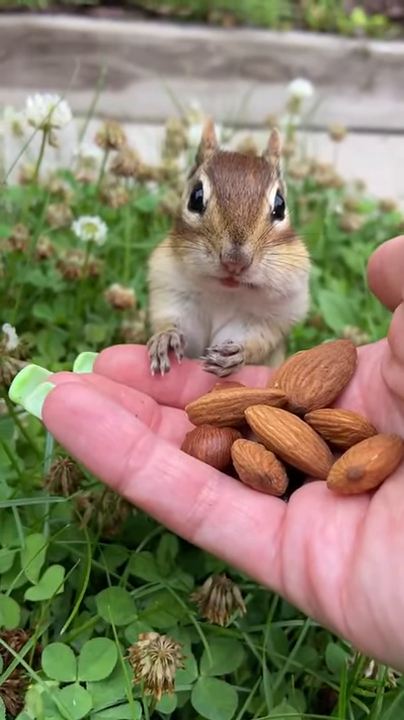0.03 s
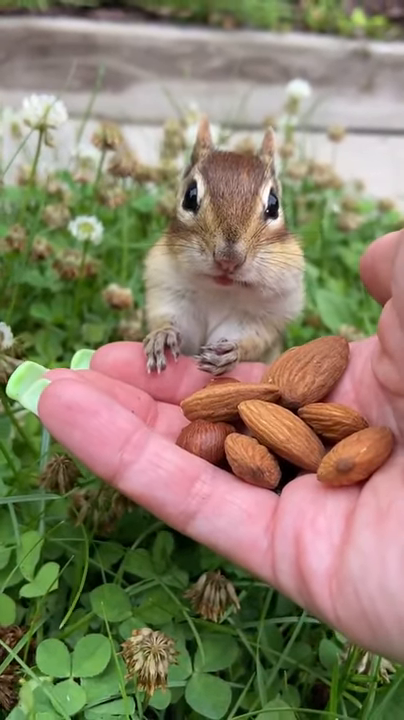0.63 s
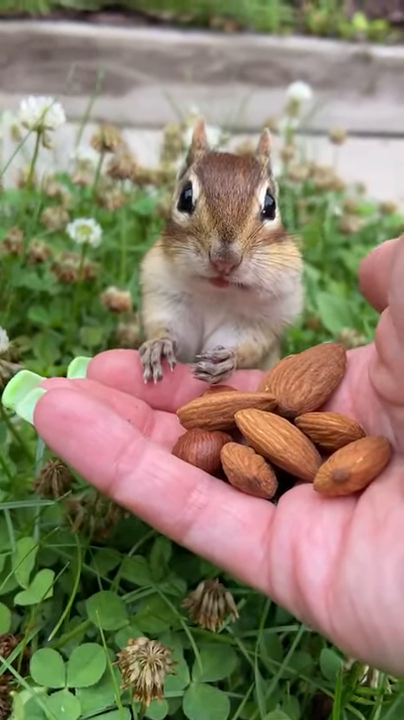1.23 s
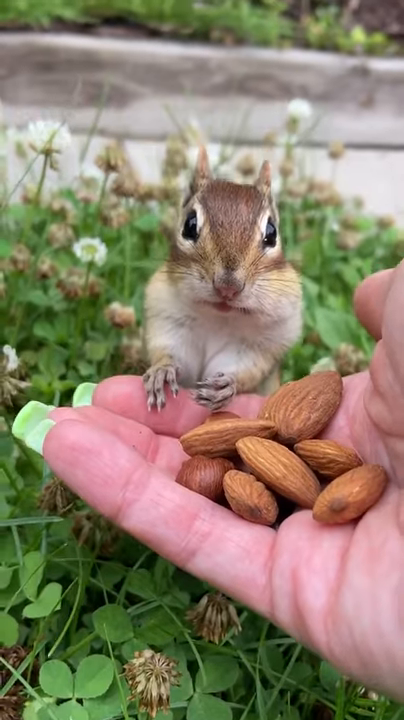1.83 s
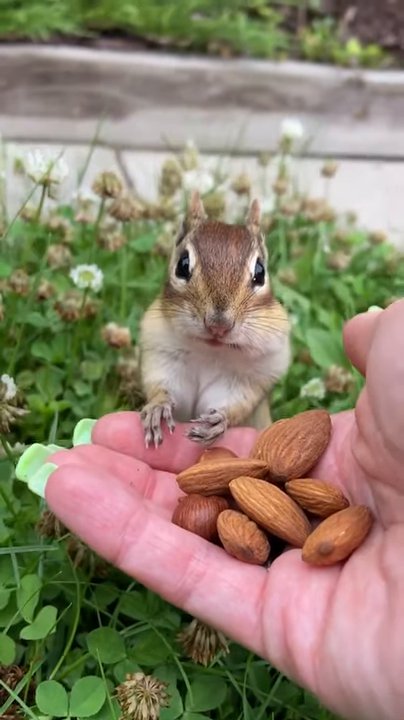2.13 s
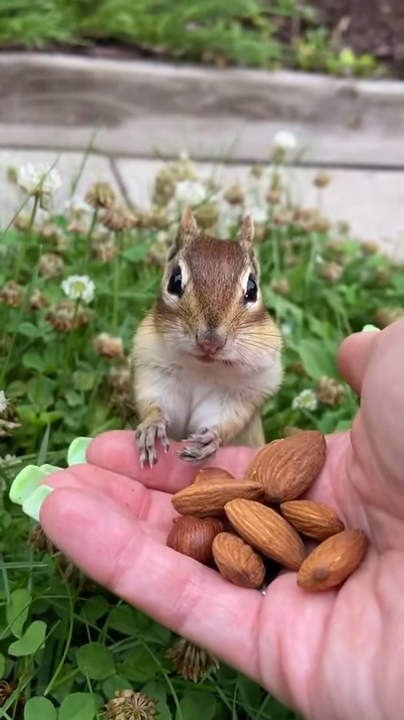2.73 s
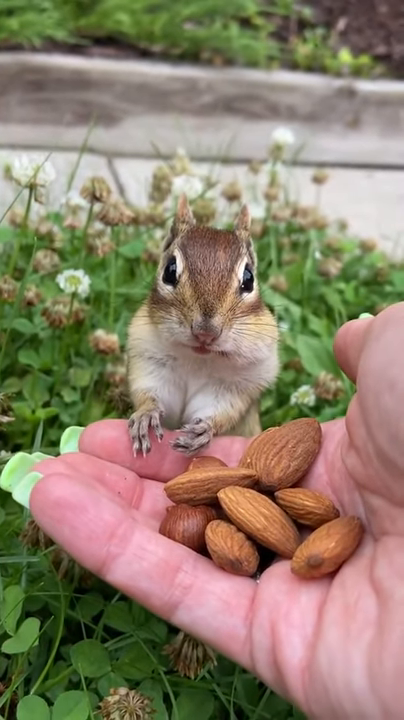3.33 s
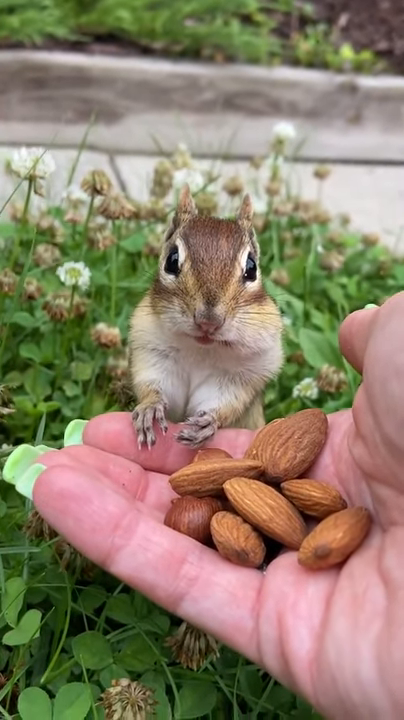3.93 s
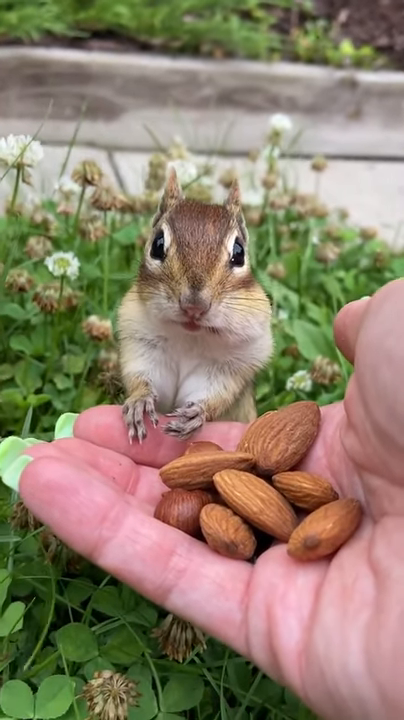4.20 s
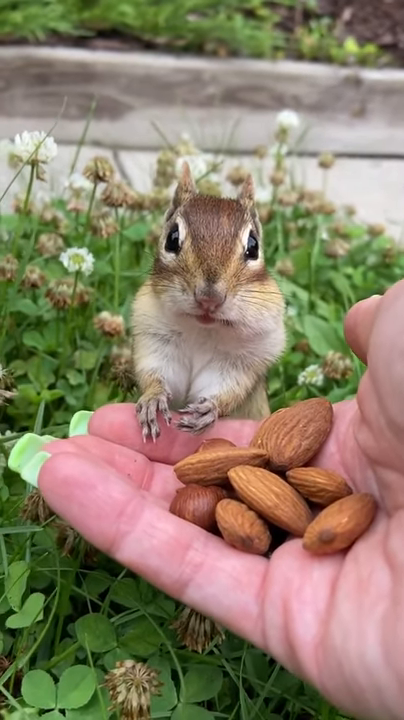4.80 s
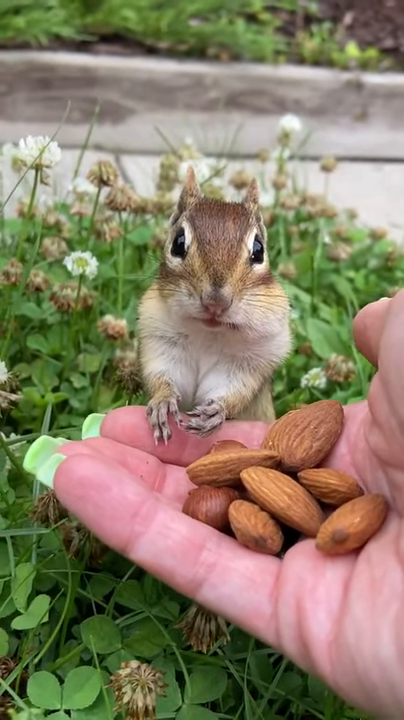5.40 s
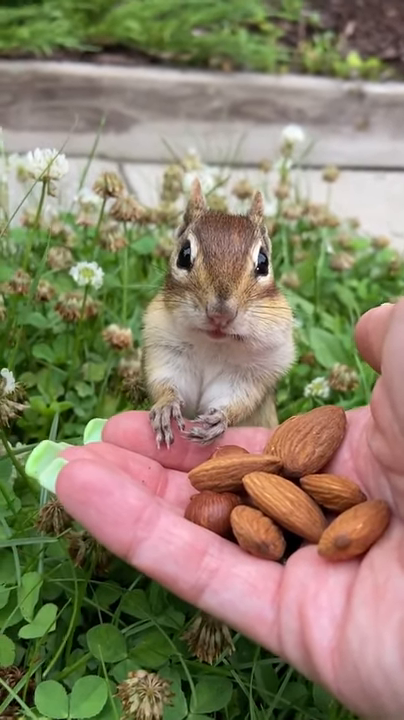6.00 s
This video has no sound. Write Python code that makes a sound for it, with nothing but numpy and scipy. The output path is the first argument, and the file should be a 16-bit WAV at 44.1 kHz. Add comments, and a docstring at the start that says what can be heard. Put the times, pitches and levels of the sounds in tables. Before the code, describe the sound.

A far engine pulls away with booming exhaust surges and a gear change, over low traffic rumble, soft hiss and approaching tyres.

```python
"""A distant engine pulls away, rises in pitch, changes gear and pulls again over rumbling traffic.
It is heard near the grass of a quiet garden beside a town street; its exhaust booms in surges.
One car passes faintly, then the tyre roar of nearer ones slowly swells, with a few dull knocks from
wheels on the uneven road and a heavy vehicle's deep rumble. A far bird sings once in the soft hiss."""
import sys
import numpy as np
from scipy import signal
from scipy.fft import rfft, irfft, next_fast_len
from scipy.io import wavfile
from scipy.ndimage import uniform_filter1d, map_coordinates

SR = 44100
rng = np.random.default_rng(int(sys.argv[2]) if len(sys.argv) > 2 else 0)


def unload_audio(sound):
    """Save the sound as a 16-bit wav file, at the path given as the first command line argument."""
    columns = np.transpose(np.atleast_2d(sound))
    # keep every value between -1 and 1, then stretch to whole-number steps
    steps = np.round(np.clip(columns, -1, 1) * 32767)
    wavfile.write(sys.argv[1], SR, steps.astype(np.int16))


N = 271215


def engine():
    """The firing rate and two overtones carry this far; they boom under load and sink at the gear change."""
    # engine speed, climbing through one gear and dropping into the next: t/s, firing rate/Hz
    speed = [(0, 79.5), (0.9, 82.2), (1.3, 86.35), (1.54, 91.14), (1.95, 94.6), (2.2, 100), (2.48, 109.2),
             (2.75, 115.8), (3.0, 121.2), (3.42, 126.7), (4.35, 88.05), (4.6, 95.6), (5.0, 101.6),
             (5.2, 102.1), (5.68, 96.6), (5.85, 102.6), (6.1, 104)]
    # exhaust under the surges: t/s, level/dB, first overtone against the lowest tone/dB
    load = [(0, -52, -8), (1.1, -43, -17), (1.6, -40, -9.5), (2.3, -42, -14.5), (2.45, -31, -10.5),
            (3.0, -36.5, -9.5), (3.35, -31, -23.5), (3.48, -48, -11), (4.3, -55, -26), (4.75, -38.5, -24),
            (5.17, -36, -16), (5.35, -42.5, -14), (5.85, -38, -13), (6.15, -37, -22)]
    # booms of the exhaust: start/s, hold/s, level/dB
    surges = [(-0.05, 0.11, -36), (0.87, 0.081, -34.5), (1.495, 0.68, -28), (2.43, 0.2, -30.5),
              (2.73, 0.18, -32.5), (3.06, 0.305, -27), (4.43, 0.18, -33), (4.88, 0.14, -30),
              (5.51, 0.21, -31.7), (6.02, 0.07, -28.2)]
    # what the way from the street then takes off those levels: f/Hz, gain/dB
    carry = [(130, -2), (185, -3), (220, -3.5), (255, -5.5), (285, -13), (400, -10)]
    firing_hz, = curves(speed)
    firing_hz = firing_hz * (1 + 0.0027 * wobble(10))  # the speed wanders a little
    steady_db, overtone_db = curves(load)
    note = np.zeros(N)
    for multiple, db in enumerate([0, overtone_db, overtone_db - 20], 1):
        partial = tone(multiple * firing_hz, flutter_db=0.67 * multiple, flutter_rate=25)
        note += amp(db + along(carry, multiple * firing_hz)) * partial
    note *= amp(1.17 * wobble(55))  # a quick, uneven shake in loudness
    booms = np.max([amp(db) * surge(start, hold) for start, hold, db in surges], axis=0)
    return np.maximum(booms, amp(steady_db)) * note * amp([[-.4], [.4]])  # a little to the right


def tyres():
    """Each car's tyres roar louder as it nears, and later turn dull; farther streets are always dull."""
    # passing cars: nearest at/s, level there/dB, time to drive its distance from us/s, dulls from/s
    cars = [(2.82, -51.5, 0.26, 4.3), (4.6, -49.5, 0.64, 4.97), (5.7, -43, 1.0, 4.57)]
    # bright tyre roar: f/Hz, level/dB
    bright_spectrum = [(120, -10), (260, 5), (380, 3), (500, -0.5), (630, -3), (830, 1.0), (1000, -2.5),
                       (1250, -7), (1600, -12.5), (2500, -19.5), (4000, -29.5), (8000, -77)]
    # dull tyre roar: f/Hz, level/dB
    dull_spectrum = [(120, -19), (190, 5), (245, 11.5), (285, 9), (380, 2), (500, 1), (610, 0), (720, 3),
                     (850, 1.6), (990, .5), (1150, -9.5), (1600, -20), (2500, -22), (4000, -34),
                     (8000, -50)]
    far_road_db, dulling_s = -52, 0.86
    t = np.arange(N) / SR
    bright_power, dull_power = 0, amp(far_road_db) ** 2
    for nearest, db, passing, dull_from in cars:
        power = amp(db) ** 2 / (1 + ((t - nearest) / passing) ** 2)  # twice as far, a quarter the power
        dullness = np.clip((t - dull_from) / dulling_s, 0, 1)
        bright_power = bright_power + (1 - dullness) * power
        dull_power = dull_power + dullness * power
    bright = np.sqrt(bright_power) * rush(bright_spectrum, patchy_db=2.4)
    dull = np.sqrt(dull_power) * rush(dull_spectrum, patchy_db=2.0)
    return amp(0.11 * wobble(9)) * (bright + dull)


def knocks(ring_s=0.14, rise_s=0.0034):
    """Wheels jolt on the uneven road: short bursts of noise that ring around one pitch and die away."""
    # knocks: t/s, level/dB, f/Hz, top of the band divided by f
    jolts = [(2.757, -46.5, 1060, 1.3), (3.04, -45, 642, 1.2), (4.78, -39.5, 560, 1.35),
             (5.087, -38.5, 816, 1.09), (5.695, -41, 773, 1.23), (6.112, -36.5, 571, 1.26)]
    out = np.zeros((2, N))
    t = np.arange(SR // 3) / SR
    for start, db, hz, edge in jolts:
        band = signal.butter(2, [hz / edge, hz * edge], "bandpass", fs=SR, output="sos")
        ring = unit(signal.sosfilt(band, rng.standard_normal(len(t))))
        hit = amp(db - 60 * t / ring_s) * (1 - np.exp(-t / rise_s)) * ring
        out += np.pad(hit, (round(start * SR), N))[:N]
    return out


def far_engines(echo_share=0.44, spread_hz=15.6):
    """Other engines come through in short snatches, their notes partly blurred by echoes."""
    # snatches: start/s, hold/s, f/Hz, level/dB
    snatches = [(0, 0.28, 238.5, -46.5), (0.08, 0.22, 166, -44.5), (0.67, 0.074, 168, -41.5),
                (1.22, 0.23, 149, -37.5), (4.68, 0.45, 281, -48.5), (5.48, 0.11, 239.5, -43)]
    out = np.zeros(N)
    for start, hold, hz, db in snatches:
        direct = tone(hz + 2.17 * wobble(8.56), flutter_db=1.0, flutter_rate=16)
        echoes = narrow_noise(N, hz, spread_hz)
        note = np.sqrt(1 - echo_share) * direct + np.sqrt(echo_share) * echoes
        out += amp(db) * surge(start, hold) * note
    return out


def heavy_vehicle(nearest_s=6, nearest_db=-44, passing_s=0.17):
    """The deep rumble of a far, heavy vehicle swells as 1 / distance."""
    # deep rumble: f/Hz, level/dB
    spectrum = [(22, -42), (38, -6), (48, -8), (58, -10), (90, -30), (300, -80)]
    t = np.arange(N) / SR
    distance = np.sqrt(1 + ((t - nearest_s) / passing_s) ** 2)  # 1 at its nearest
    return amp(nearest_db) / distance * rush(spectrum, patchy_db=2, alike=[(40, 1.0)])


def bird():
    """Distance and echoes blur each note of a bird into a softly swelling band of noise."""
    # one phrase: start/s, length/s, f/Hz, spread/Hz, level/dB
    song = [(3.441, 0.16, 3040, 130, -59), (3.517, 0.21, 6900, 650, -64), (3.621, 0.61, 4630, 170, -68)]
    t = np.arange(N) / SR
    out = np.zeros((2, N))
    for start, length, pitch_hz, spread_hz, db in song:
        swell = np.sin(np.pi * np.clip((t - start) / length, 0, 1))
        out += amp(db) * swell * narrow_noise((2, N), pitch_hz, spread_hz)
    return out


def traffic(rumble_db=-38.5, drone_db=-40, drifts_per_s=2.524):
    """Many far engines blur into a deep rumble and a drone above it, both drifting in loudness."""
    # rumble: f/Hz, level/dB
    rumble_spectrum = [(15, -62), (25, -43), (38, -13), (50, -6.5), (66, 2.5), (85, 0.5), (110, -8),
                       (150, -5), (250, -33), (500, -78)]
    # drone: f/Hz, level/dB
    drone_spectrum = [(70, -11.5), (120, -0.5), (160, -1), (200, -3.5), (250, -7), (310, -14), (400, -16.5),
                      (550, -22.5), (1000, -33.5), (2000, -71)]
    rumble = rush(rumble_spectrum, patchy_db=1.9, alike=[(40, 0.99), (150, 0.99)])
    drone = rush(drone_spectrum, patchy_db=1.07)
    return (amp(rumble_db - 0.3 * wobble(drifts_per_s)) * rumble
            + amp(drone_db + 0.6 * wobble(drifts_per_s)) * drone)


def hiss(level_db=-54, treble_hz=4240, treble_fall_db_per_s=1.25, body_rise_db_per_s=0.04):
    """A wide, soft hiss that swells gently once, while its treble flickers and slowly fades."""
    # hiss: f/Hz, level/dB
    spectrum = [(300, -16), (800, -0.5), (1300, 5.5), (1900, 0.5), (2700, 0), (3300, -2.5), (4100, -4),
                (4900, -2.5), (6100, -7), (7500, -9), (9000, -11), (10500, -12.5), (12300, -13.5),
                (13100, -18.5)]
    t = np.arange(N) / SR
    noise = rush(spectrum, patchy_db=2.0)
    body = filtered(noise, lambda hz: 1 / (1 + (hz / treble_hz) ** 2))
    treble = (noise - body) * amp(-treble_fall_db_per_s * t + 0.63 * wobble(18))
    swell_db = 1.8 * np.exp(-.5 * ((t - 3.74) / 0.32) ** 2)
    return amp(level_db + swell_db) * (body * amp(body_rise_db_per_s * t) + treble)


def machine_hum(pitch_hz=329, level_db=-62):
    """A machine hums faintly on one slightly wavering note."""
    return amp(level_db) * tone(pitch_hz + 2 * wobble(5.5), flutter_db=4.0, flutter_rate=4.02)


def rush(spectrum, patchy_db, alike=None):
    """Open-air stereo noise of average strength 1, with drifting louder and softer patches."""
    # how alike left and right sound in the open air: f/Hz, likeness (1 = the same)
    open_air = [(60, 0.97), (150, .97), (260, 0.86), (400, 0.65), (620, 0.3), (750, 1), (1000, 0.35),
                (1200, 0.59), (1700, 0.27), (2500, 0.34), (3700, 0.32), (5700, 0.0075), (7300, 0.46),
                (8600, -0.49), (9500, -0.37), (10600, 0.55), (11600, 0.17), (12600, -0.47)]
    # how far the left side is ahead: f/Hz, phase/rad
    lead = [(60, 0), (260, -0.04), (400, 0.56), (620, 1), (750, 1.5), (900, 1.5), (1100, 2), (1450, 2.5),
            (1900, .5), (2300, 1.8), (3000, 0.2), (5500, 0)]
    # how much louder the left side is: f/Hz, level/dB
    lean = [(60, -1.2), (110, 0.1), (240, -3), (480, -2.5), (620, -1.5), (780, 0.1), (1700, 1.3), (2800, 3),
            (4100, 1), (4800, 3.5), (7200, 0.5), (9000, 0)]
    alike = alike or open_air
    cells = signal.stft(rng.standard_normal((2, N)), nperseg=1024)[2]  # noise split by pitch and time
    patches = uniform_filter1d(rng.standard_normal(cells.shape[1:]), size=4, axis=0)
    patches = uniform_filter1d(patches, size=8, axis=1)
    pair = signal.istft(cells * amp(patchy_db * unit(patches)), nperseg=1024)[1][:, :N]
    width = lambda hz: np.arccos(np.clip(along(alike, hz), -1, 1)) / 2
    colour = lambda hz: amp(along(spectrum, hz)) * [np.cos(width(hz)), np.sin(width(hz))]
    mid, side = filtered(pair, colour)
    half = np.array([[.5], [-.5]])  # left and right move opposite ways
    place = lambda hz: amp(half * along(lean, hz)) * np.exp(1j * half * along(lead, hz))
    return unit(filtered(np.array([mid + side, mid - side]), place))


def tone(hz, flutter_db, flutter_rate):
    """A pure tone that follows a pitch curve; its strength flutters on the way through the air."""
    return unit(np.sin(2 * np.pi * np.cumsum(hz) / SR) * amp(flutter_db * wobble(flutter_rate)))


def narrow_noise(shape, pitch_hz, spread_hz):
    """Noise gathered closely around one pitch."""
    bell = lambda hz: np.exp(-.5 * ((hz - pitch_hz) / spread_hz) ** 2)
    return unit(filtered(rng.standard_normal(shape), bell))


def surge(start, hold, rise_s=0.025, fall_s=0.11):
    """One boom of an exhaust rises from 0 to 1, holds and falls back."""
    t = np.arange(N) / SR - start
    return np.clip(t / rise_s, 0, 1) * np.clip(1 - (t - hold) / fall_s, 0, 1)


def amp(db):
    """Turn decibels into a number to multiply by."""
    return 10 ** (np.asarray(db) / 20)


def unit(x):
    """Scale to an average strength (rms) of 1."""
    return x / np.sqrt(np.mean(x ** 2) + 1e-20)


def along(points, hz):
    """Read between rows of f/Hz, value on a musical (log) pitch scale."""
    f, v = np.transpose(points)
    return np.interp(np.log(hz + 1), np.log(f + 1), v)


def curves(rows):
    """One value per sample for each column after the time."""
    times, *columns = np.transpose(rows)
    return [np.interp(np.arange(N) / SR, times, column) for column in columns]


def wobble(rate):
    """A smooth curve through `rate` random points a second."""
    return map_coordinates(rng.standard_normal(int(N * rate / SR) + 4), [np.arange(N) * rate / SR])


def filtered(x, response):
    """Multiply each frequency in x by response(hz)."""
    size = next_fast_len(N + SR // 2)
    return irfft(rfft(x, size) * response(np.fft.rfftfreq(size, 1 / SR)), size)[..., :N]


def scene():
    """Everything heard in the garden, left and right."""
    return (engine() + far_engines() + traffic() + heavy_vehicle() + tyres() + knocks()
            + bird() + hiss() + machine_hum())


def record(dry):
    """The sound starts and stops without a click, and its highest treble is cut off."""
    fade_s, top_hz = 0.003, 13100
    from_edge_s = np.minimum(np.arange(N), np.arange(N)[::-1]) / SR
    fade = np.minimum(from_edge_s / fade_s, 1)
    return filtered(dry * fade, lambda hz: hz < top_hz)


dry = scene()
out = record(dry)
unload_audio(out)
```